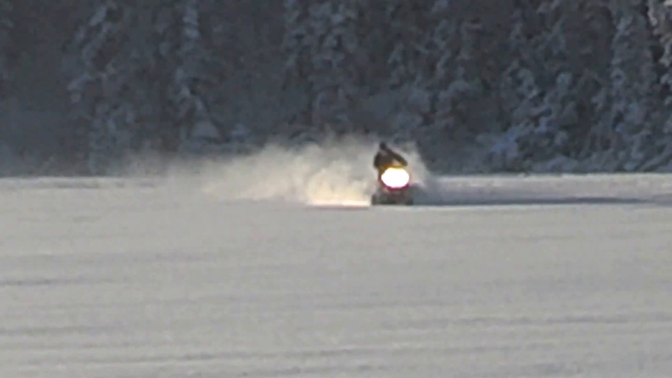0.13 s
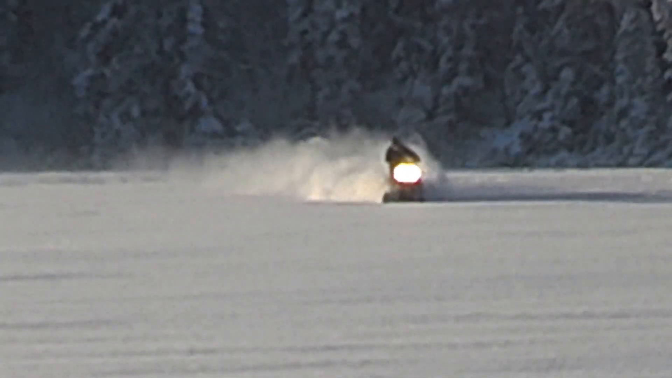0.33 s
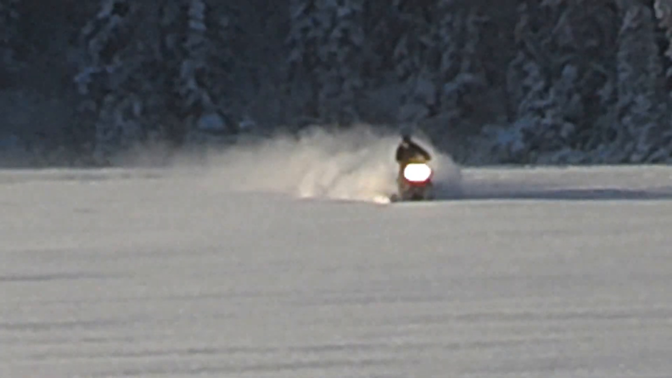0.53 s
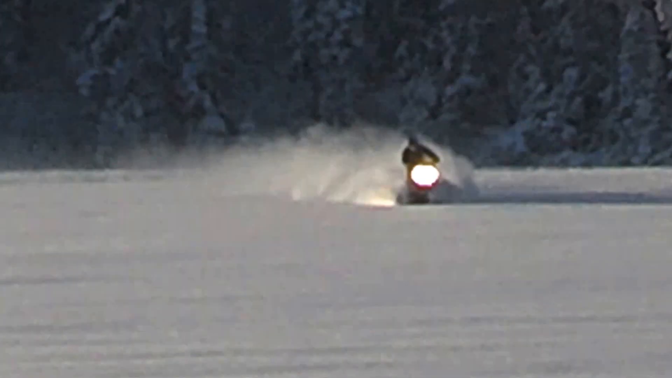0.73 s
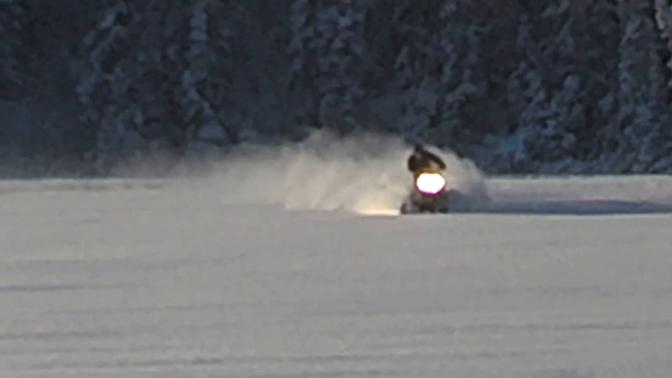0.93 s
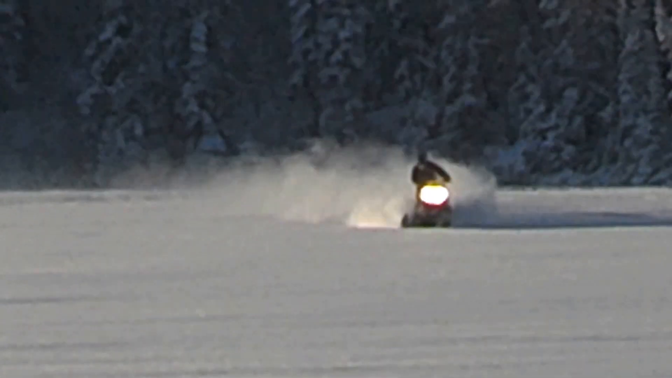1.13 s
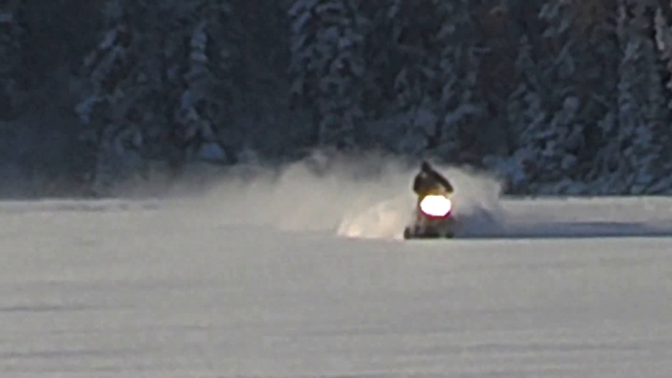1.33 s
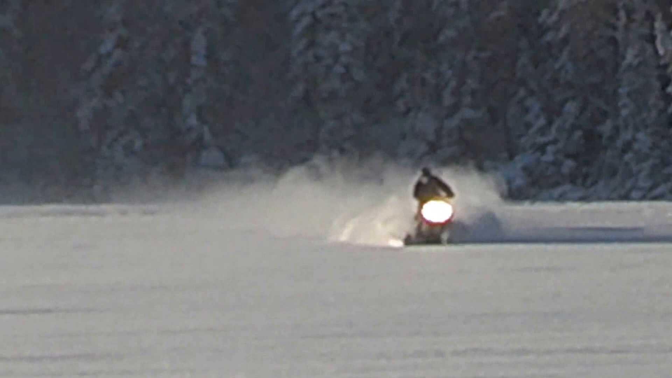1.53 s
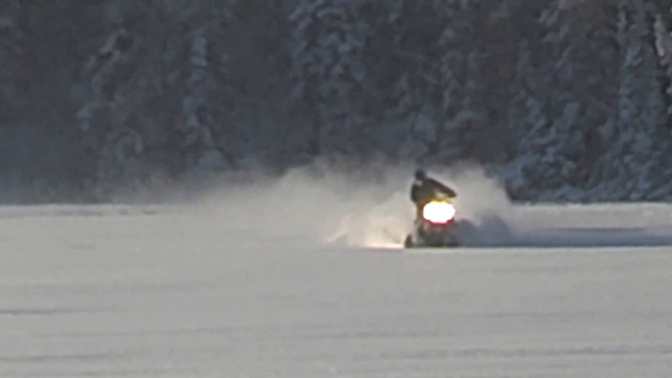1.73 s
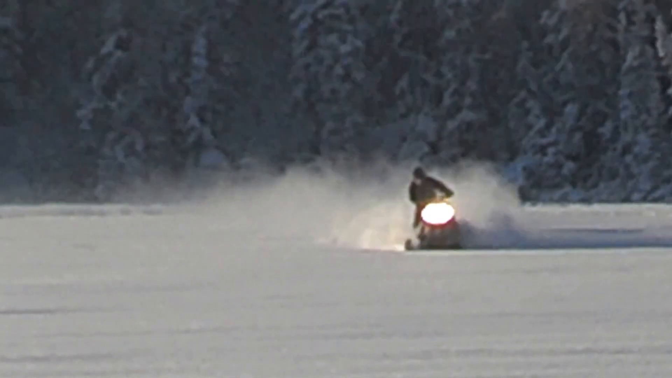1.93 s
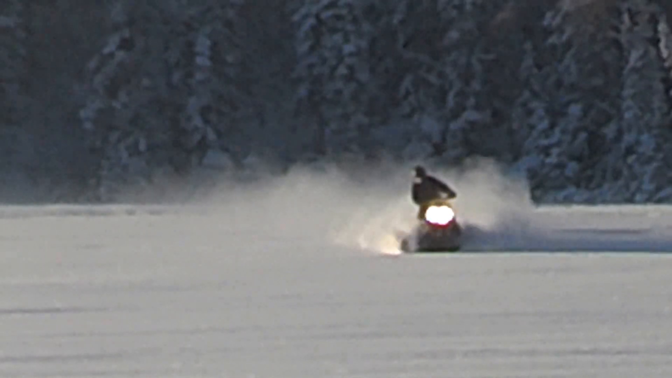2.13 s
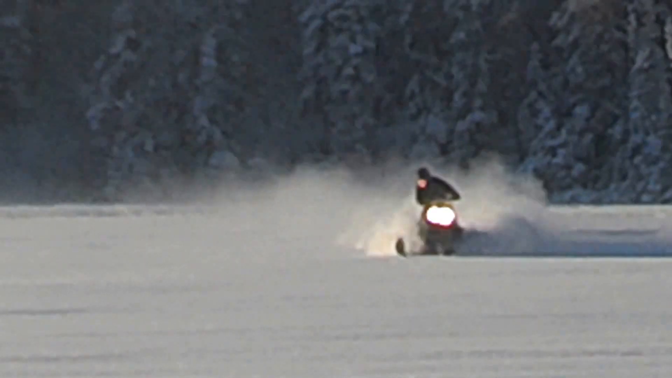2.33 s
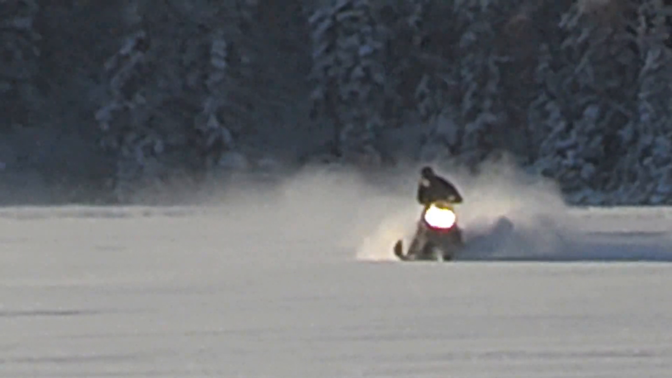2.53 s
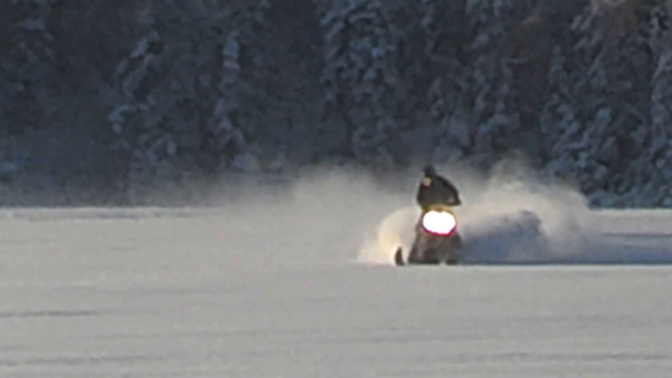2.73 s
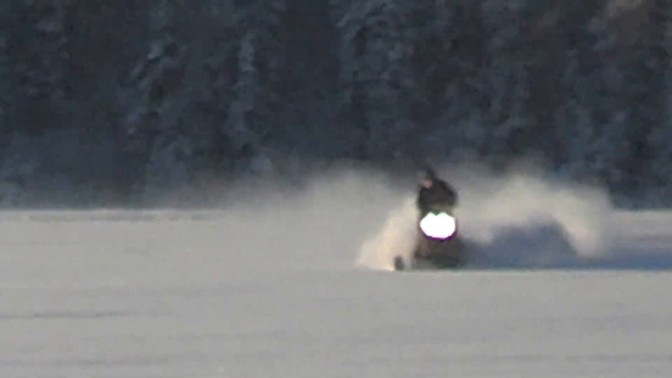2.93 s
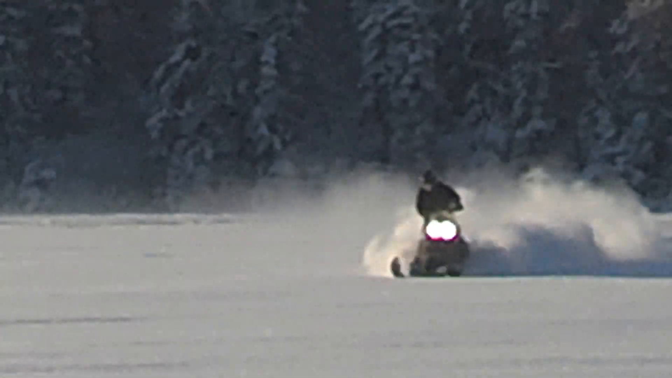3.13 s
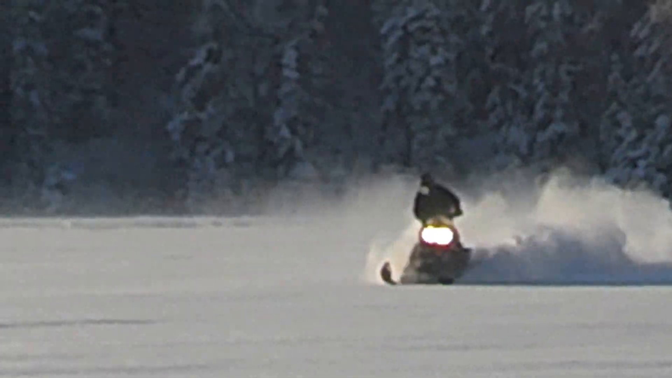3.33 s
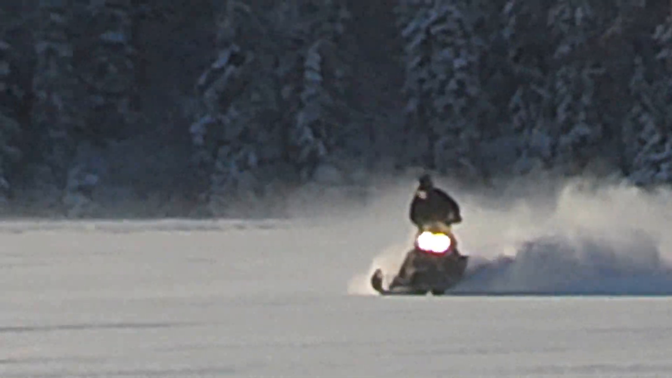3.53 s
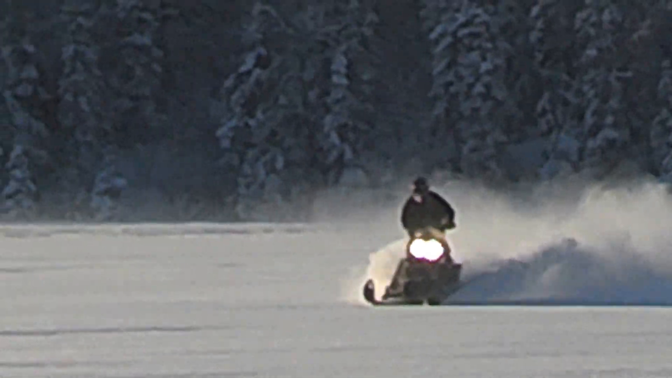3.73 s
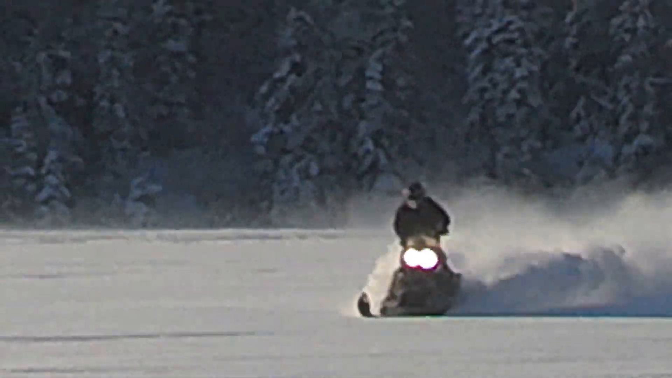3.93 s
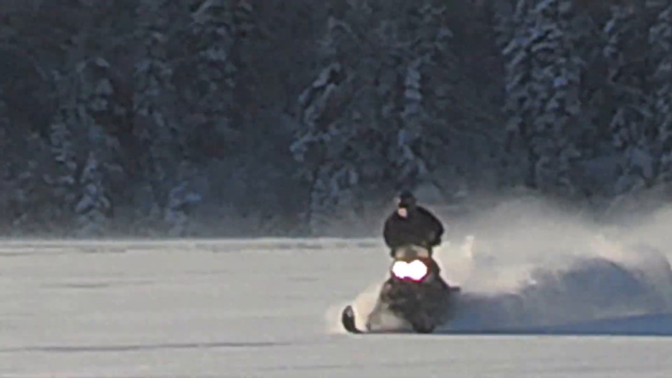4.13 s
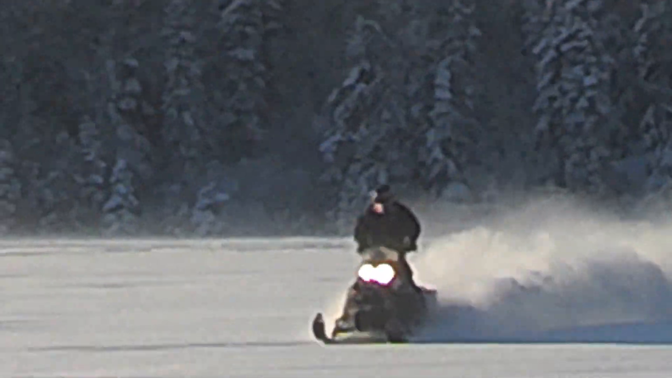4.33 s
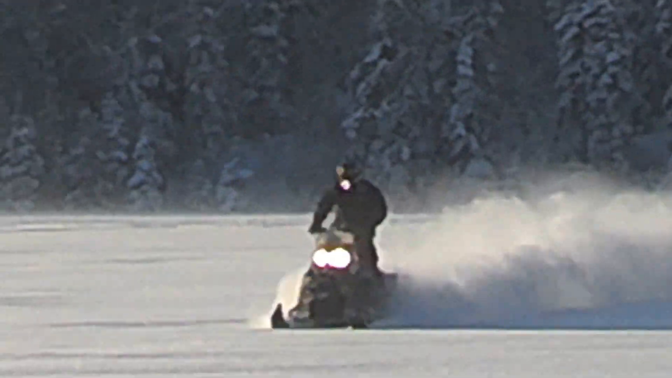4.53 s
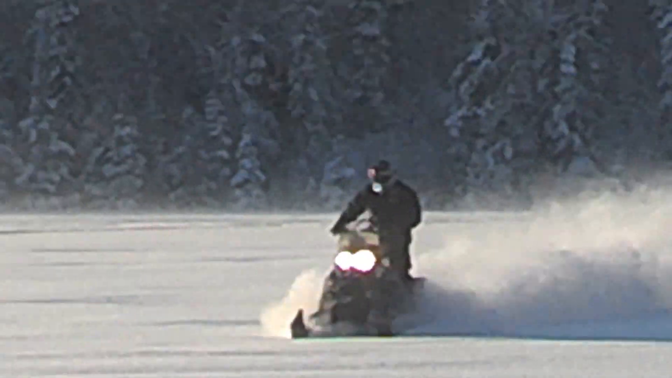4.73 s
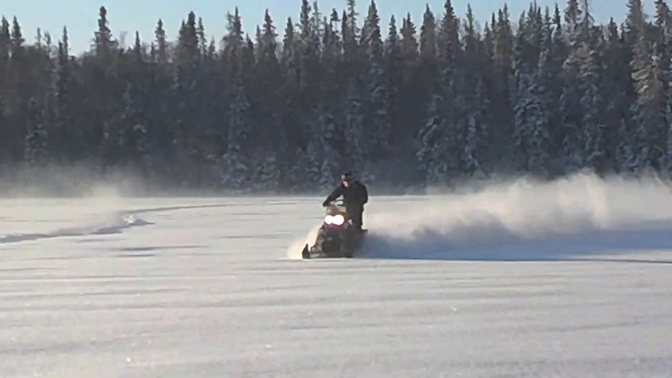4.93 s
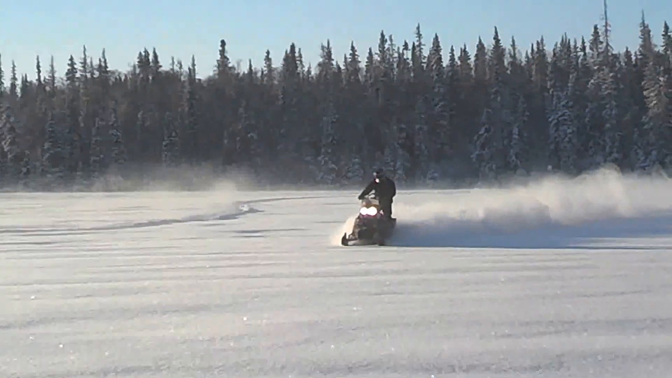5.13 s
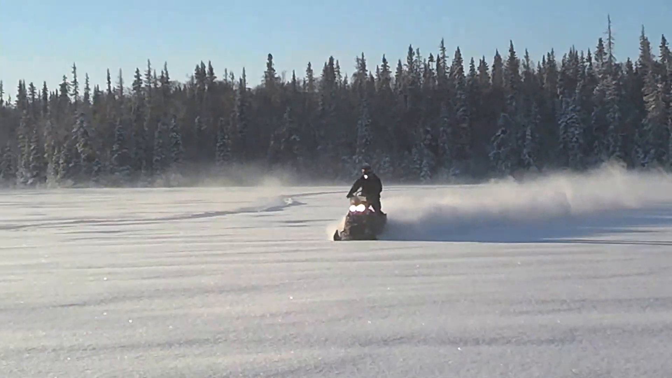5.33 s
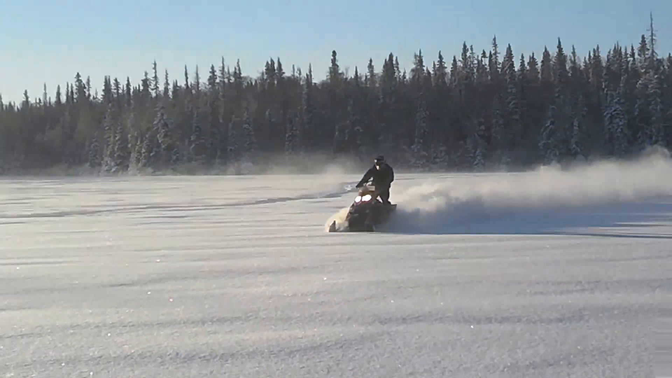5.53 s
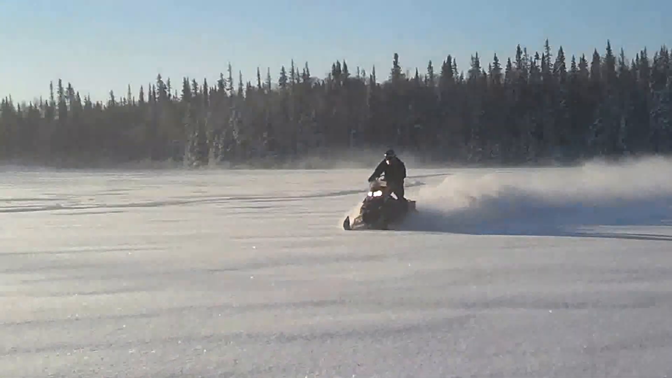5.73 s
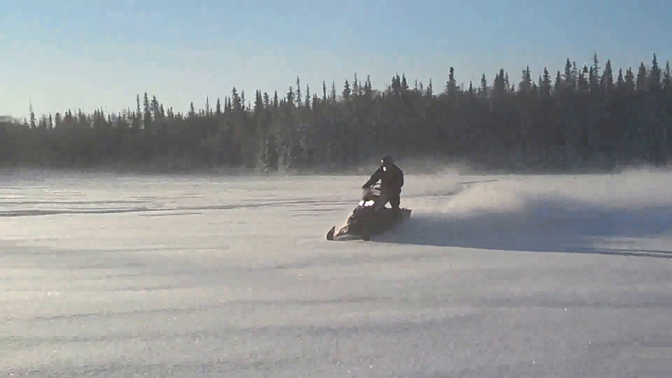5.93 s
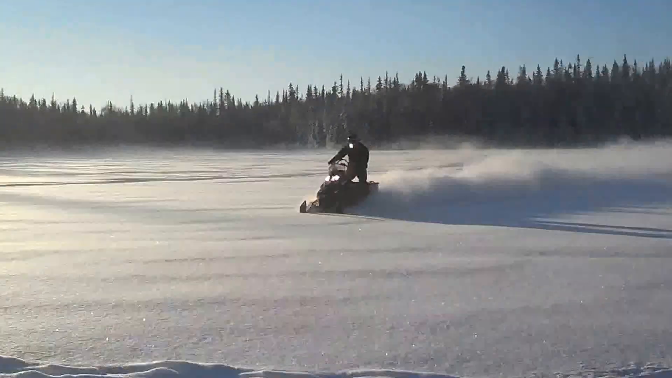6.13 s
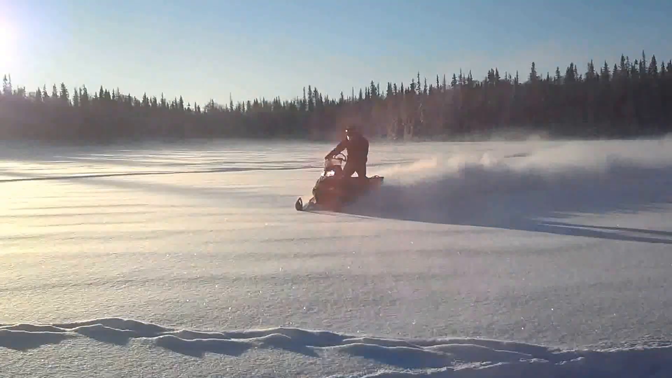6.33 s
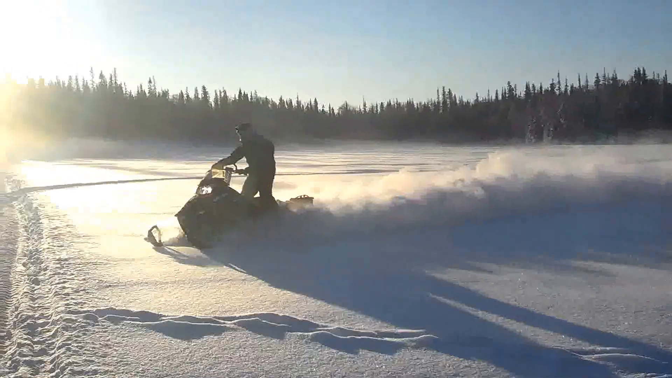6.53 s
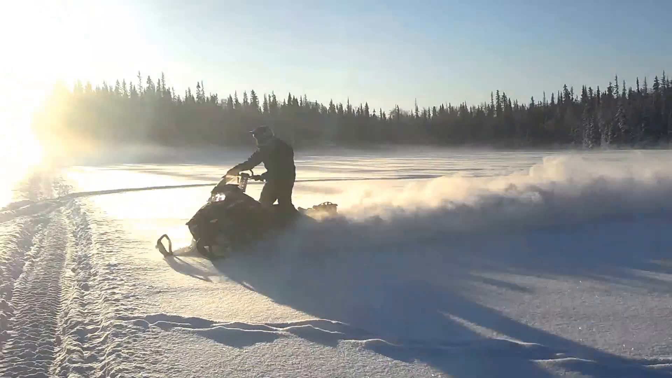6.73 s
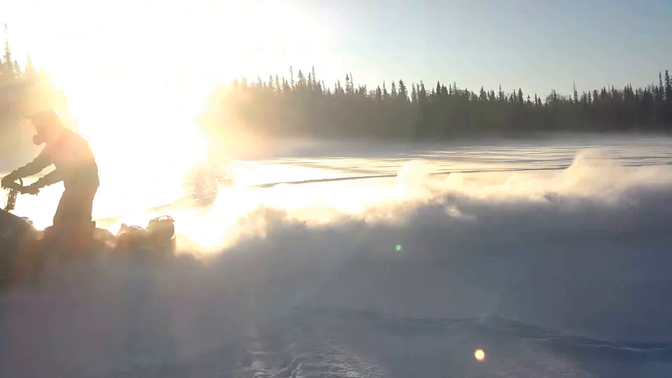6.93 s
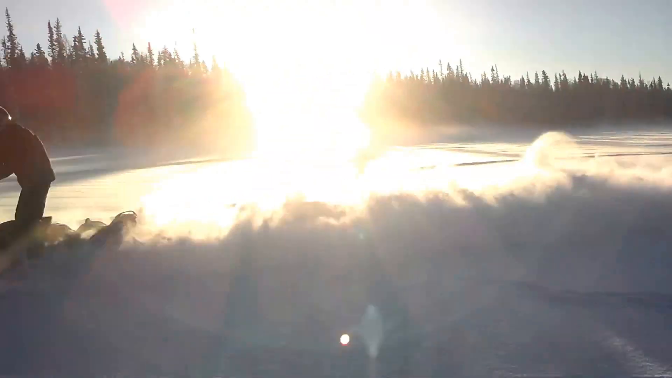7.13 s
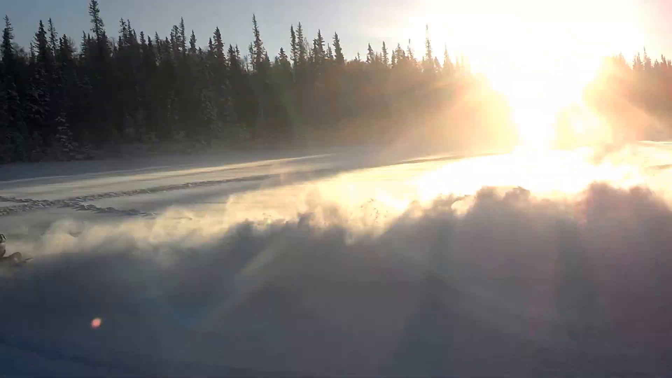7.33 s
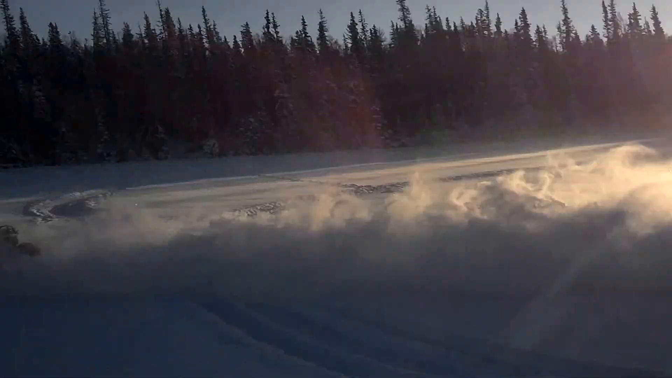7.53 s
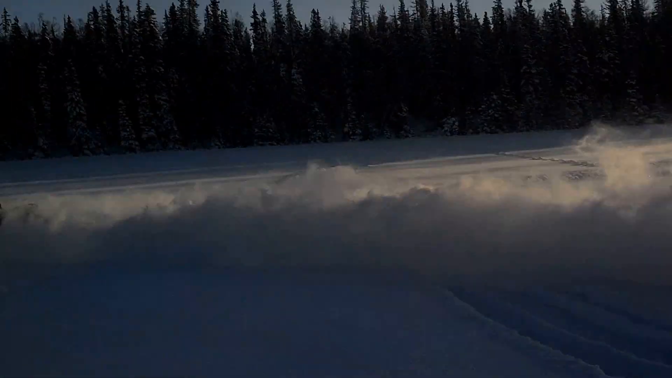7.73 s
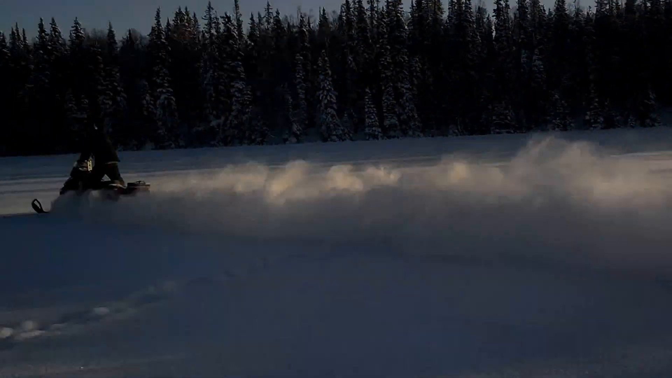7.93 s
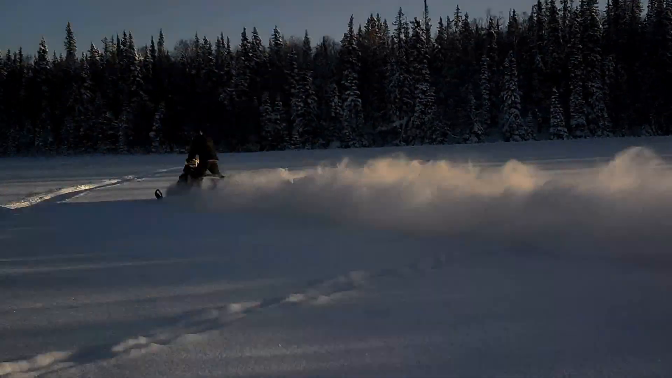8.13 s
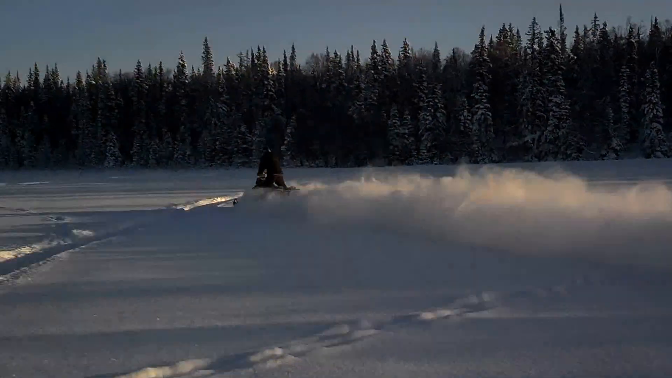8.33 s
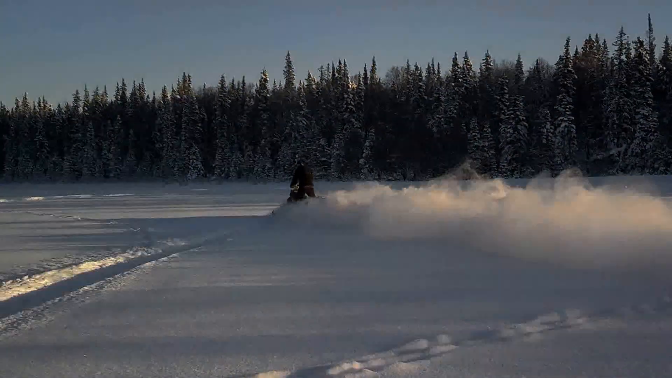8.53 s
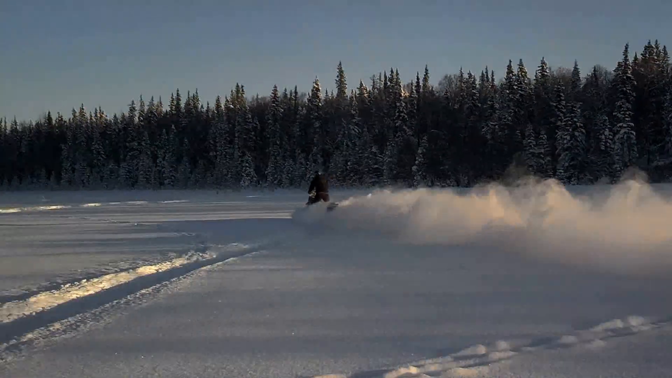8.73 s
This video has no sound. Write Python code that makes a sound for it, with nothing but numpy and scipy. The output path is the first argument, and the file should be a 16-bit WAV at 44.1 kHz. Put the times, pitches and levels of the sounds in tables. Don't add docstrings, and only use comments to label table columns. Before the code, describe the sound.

A parked engine idles low beside a handheld stereo microphone, puffing and knocking. Far off, a snowmobile's nasal two-stroke whine wavers, bogs down and climbs, growing louder and rougher as it nears. At full roar the sound drops out for under half a second, returns with a stuttering scrap, then continues lower and raspier, with track whir and flung snow. Faint tree echoes surround it.

```python
import sys
import numpy as np
from scipy import signal
from scipy.fft import rfft, irfft, next_fast_len
from scipy.io import wavfile
from scipy.ndimage import uniform_filter1d

SR = 44100
rng = np.random.default_rng(int(sys.argv[2]) if len(sys.argv) > 2 else 0)


def to_wav(sig):
    pcm = np.clip(np.atleast_2d(sig), -1, 1) * 32767
    pcm = np.round(pcm).astype(np.int16)
    wavfile.write(sys.argv[1], SR, pcm.T)


def makeup_ratio(level_db):
    decades = np.asarray(level_db, float) / 20
    return 10 ** decades


N = 391608
TIME = np.arange(N) / SR
STALL, RESUME, SETTLED = 6.333, 6.754, 6.805
HELD = np.where((TIME > STALL) & (TIME < SETTLED), STALL, TIME)
CROSS = 16

# t/s, roar level/dB
RIDE = [(0, -39), (.4, -35.5), (1, -37.5), (1.3, -38), (2.2, -35.5), (2.85, -33), (3.3, -33), (3.9, -30.5),
        (4.87, -26.5), (5.3, -22.5), (6.32, -21), (6.82, -23.5), (7.5, -23.5), (7.9, -26), (8.36, -23),
        (8.65, -24), (8.88, -24.5)]
# t/s, stage (0 far, 1 closing, 2 near, 3 past, 4 gone), throttle level/dB
STAGE = [(0, 0.5, -0.5), (.9, 0, -4.5), (1.6, 0.5, -1), (3.4, 1, -2), (4.7, 3, -3), (5.7, 2.5, 3.5),
         (6.3, 2, 6), (6.85, 8, 0.5), (7.3, 3, 3.5), (7.9, 7, -4), (8.3, 5.5, -4), (8.88, 4, -5.5)]
# t/s, lead of the left port/samples
BEARING = [(0, 4.43), (3, 3.85), (6.3, 4.2), (6.82, 10.5), (7.15, 10.8), (7.4, 12), (7.7, 8.2), (8.2, 6.1),
           (8.88, 6.6)]
NEAR_DB = -23


def snowmobile():
    hz = crank()
    roar_db, = curves(RIDE)
    stage, throttle_db = curves(STAGE)
    clatter_db = -43 + 1.1 * (roar_db - NEAR_DB)
    spray_db = -42 + 1.61 * (roar_db - NEAR_DB)
    turns = np.cumsum(hz * (1 + 0.001525 * drift(hz=21.8))) / SR
    engine = engine_orders(hz, turns, stage, throttle_db, roar_db, clatter_db)
    engine += roar_and_clatter(turns, stage, throttle_db, roar_db, clatter_db)
    engine += track_lugs()
    return ports(engine, curves(BEARING)[0], bends=True) + trees(engine) + snow_spray(spray_db)


# t/s, f/Hz
CRANK = [(0, 121.4), (.6, 117.5), (2.04, 117.8), (2.35, 127), (3.05, 126), (3.3, 123.3), (3.52, 125.9),
         (3.63, 123.6), (3.95, 129), (5.3, 129.9), (6.32, 128.6), (6.82, 121.3), (7.18, 109.6),
         (7.45, 111.6), (7.62, 107.7), (8.6, 103.3), (8.88, 106.1)]
# deepest t/s, drop f/Hz, sinking t/s, recovery t/s
BOGS = [
    (.32, 14, .2, .25),
    (.9, 16, .23, .42),
    (2.8, 8.8, .3, .23),
    (5.68, 3, .17, .24),
    (8.22, 12.2, .62, .4),
]


def crank():
    hz, = curves(CRANK)
    for s, drop_hz, sink, rise in BOGS:
        depth = np.interp(HELD, [s - sink, s, s + rise], [0, 1, 0])
        hz = hz - drop_hz * np.sin(np.pi / 2 * depth) ** 2
    return hz


PASS_S, PASS_SPREAD_S, DOPPLER_DROP = 7.4, 0.27, 0.1458


def engine_orders(hz, turns, stage, throttle_db, roar_db, clatter_db):
    passed = (1 + np.tanh((HELD - PASS_S) / PASS_SPREAD_S)) / 2
    pipe_hz = hz / (1 - DOPPLER_DROP * passed)
    sweep_hz_s = uniform_filter1d(abs(np.gradient(hz)) * SR, size=4000)
    sweep_db = np.minimum(.06 * sweep_hz_s, 4) * (stage < .5)
    fan_db = 7 * np.clip(1 + (roar_db - NEAR_DB) / 5, 0, 1)
    sparse = slice(None, None, 100)
    engine = np.zeros(N)
    for k in range(1, 42):
        if k < 24:
            pipe_db = exhaust_db(k * pipe_hz[sparse], stage[sparse]) + sing_db(k, hz[sparse], TIME[sparse])
            db = throttle_db + np.interp(TIME, TIME[sparse], pipe_db)
            db += 1.5 * (k % 3 == 0)
        else:
            db = clatter_db - 7 - .3 * (k - 24) + fan_db * (k == 34)
        engine += tone(turns, k, db - sweep_db + 2.2 * drift(hz=5.))
    return engine


# f/Hz, level/dB
EXHAUST_FAR = [(130, -65), (390, -60), (520, -51.5), (1300, -45.5), (1800, -76.5), (2050, -76),
               (3000, -61.5)]
# f/Hz, level/dB
EXHAUST_NEAR = [(130, -51.5), (260, -46.5), (390, -52.5), (520, -50.5), (900, -48.5), (1300, -45.5),
                (2200, -43.5), (3000, -67)]
# f/Hz, level/dB
EXHAUST_BEHIND = [(130, -59.5), (260, -50), (520, -44), (900, -48.5), (1300, -43), (2200, -38.5),
                  (3000, -59.5)]
# f/Hz, width f/Hz, lift level/dB from afar, close in front, from behind
PIPE = [(455.7, 40, 16.5, 1.7, 0.58), (645, 35, -18.5, 4, 4), (787, 75, 4.5, 3.3, 3.1),
        (970, 53, 0.5, 0.51, 3.7), (1124, 88, 9.5, 3, 8.1), (1472, 100, 14.5, 3, 2.2), (2001, 26, 1, 5, 4)]


def exhaust_db(hz, stage):
    aspects = [np.transpose(points) for points in (EXHAUST_FAR, EXHAUST_NEAR, EXHAUST_BEHIND)]
    far, near, behind = [np.interp(np.log(hz), np.log(f), db) for f, db in aspects]
    for f, w, *lift_db in PIPE:
        resonance = 1 / (1 + (2 * (hz - f) / w) ** 2)
        far, near, behind = [far, near, behind] + np.outer(lift_db, resonance)
    arriving = (near - far) * np.clip(stage / 2, 0, 1)
    leaving = (behind - near) * np.clip(stage - 2, 0, 1)
    return far + arriving + leaving


# t/s, spread t/s, heard f/Hz, lift level/dB
SINGS = [(1.65, .42, 1645, 10), (1.7, .5, 940, 5), (2.2, .15, 1470, 8), (2.35, .25, 1135, 5),
         (4.3, .4, 1160, 6), (3.45, .53, 1120, 13), (3.35, .5, 1495, 9), (5, .9, 1945, 6),
         (5.7, .75, 645, 7), (5.6, .9, 775, 6), (5.65, .2, 512, 9), (5.68, .2, 1020, 8),
         (5.7, .14, 1145, 8), (6, .5, 1160, 6), (6.15, .2, 645, 5), (6.1, .25, 1680, 7), (6.15, .2, 515, 8),
         (7.5, .33, 660, 12), (7.68, .13, 960, 6), (7.68, .13, 1490, 8), (8.1, .25, 475, 10),
         (8.35, .13, 1520, 11), (8.22, .1, 1120, 9), (8.42, .13, 980, 8), (8.7, .25, 1145, 10),
         (8.8, .3, 630, 14), (8.66, .22, 835, 13), (8.78, .14, 1050, 12)]


def sing_db(k, hz, t):
    lift_db = 0
    for s, spread, f, db in SINGS:
        if round(f / np.interp(s, t, hz)) == k:
            lift_db = lift_db + db * np.exp(-((t - s) / spread) ** 4)
    return lift_db


# f/Hz, level/dB per Hz
ROAR = [(100, -18.5), (170, -5), (190, -14), (263, -5), (331, -4.5), (636, 2.5), (757, -3.5), (1140, 5),
        (1250, 4.5), (1710, 5), (2300, -35), (2990, -48), (5060, -120)]
# f/Hz, level/dB per Hz
CLATTER = [(1800, -23.5), (2400, -8), (2900, -18), (3500, 11), (4300, -0.5), (5200, -7.5), (6500, -3),
           (9000, -38)]
# f/Hz, level/dB per Hz
RASP = [(1500, -24), (1850, 1.5), (2200, -3), (2550, 2), (3000, -60)]
RASP_DB = [-52, -44, -36, -37.5, -27.5]


def roar_and_clatter(turns, stage, throttle_db, roar_db, clatter_db):
    beat = np.exp(-(2 * turns % 1) / 0.31)
    roar = evened(noise(ROAR, patchy_db=1.5) * (2.9 + beat))
    clatter = evened(noise(CLATTER, patchy_db=4.5) * (1.9 + beat))
    rasp = evened(noise(RASP, patchy_db=1.5) * (1.3 + beat))
    clatter_db = clatter_db + 4 * (TIME > SETTLED)
    rasp_db = throttle_db + np.interp(stage, range(5), RASP_DB)
    return makeup_ratio(roar_db - 4.0) * roar + makeup_ratio(clatter_db) * clatter + makeup_ratio(rasp_db) * rasp


# t/s, f/Hz, level/dB
TRACK = [(6.82, 155.3, -38), (7.066, 138.3, -33.5), (7.44, 138.6, -35), (7.5, 135.4, -48),
         (8.088, 122.2, -47.5), (8.3, 122.2, -43)]
LUG_ORDERS_DB = [-6, 0, -8]


def track_lugs():
    lug_hz, lug_db = curves(TRACK)
    turns = np.cumsum(lug_hz) / SR
    lugs = sum(tone(turns, k, lug_db + db) for k, db in enumerate(LUG_ORDERS_DB, 1))
    return lugs * (TIME > SETTLED) * np.clip((8.4 - TIME) / 0.17, 0, 1)


# f/Hz, level/dB per Hz
SPRAY = [(3000, 2.5), (5500, 0.5), (6800, -6.5), (8700, -3), (12000, -6.5), (15000, -6.5), (17000, 4.5)]


def snow_spray(spray_db):
    gusts = makeup_ratio(spray_db + 7.0 + 0.82 * drift(hz=47.0))
    return gusts * np.array([noise(SPRAY, patchy_db=-1.5), noise(SPRAY, patchy_db=0.0)])


# t/s, firing f/Hz, level/dB, bearing as left-right level/dB
IDLE = [(0, 39, -38, -19.5), (.56, 41.05, -38, -19.5), (1.05, 40.25, -38, -21), (2, 39.32, -38, -17),
        (2.64, 40.47, -38, -23), (3.43, 39.5, -37.5, -19), (3.63, 40.83, -38, -22),
        (4.87, 39.8, -38.5, -31), (5.51, 38.43, -40, -74), (6.32, 40.1, -44, -14.5), (6.82, 37.96, -51, -8),
        (7.15, 37.98, -60, -16), (7.54, 43.07, -40.5, 9), (7.71, 40.53, -44, 12), (8.47, 40.17, -38.5, 16),
        (8.88, 39.95, -38.5, 17)]
# order, level/dB
IDLE_ORDERS = [(1, -22.5), (2, -12), (3, 1), (4, -6.5), (5, -11.5), (6, -22), (7, -8.5), (8, -20.5),
               (9, -13.5), (10, -15)]
# f/Hz, level/dB per Hz
IDLE_PUFF = [(50, -40), (90, -4.5), (200, -1.5), (400, -2.5), (700, -1.5), (1100, 1.5), (1600, -5.5),
             (2200, -11), (3500, -61)]
# t/s, nominal peak level/dB (unused: only the times steer the crank)
KNOCKS = [
    (0.223, -21),
    (0.7117, -27),
    (1.061, -16),
    (1.1138, -24),
    (1.2126, -37),
    (1.3655, -24),
    (1.414, -25),
    (1.5599, -26),
]


def idler():
    hz, db, bearing_db = curves(IDLE)
    db = uniform_filter1d(db, size=9000)
    fires = np.cumsum(hz * (1 + .008 * drift(hz=12.))) / SR
    at = np.transpose(KNOCKS)[0]
    slip = np.interp(at, TIME, fires) / 2
    fires += 2 + 2 * np.interp(TIME, at, np.unwrap(-slip % 1, period=1))
    top_db = IDLE_ORDERS[2][1]
    hum = sum(tone(fires, k, db + o_db - top_db + 1.2 * drift(hz=12.0)) for k, o_db in IDLE_ORDERS)
    strength_db = 1.5 * rng.standard_normal(500) + np.resize([1.5, -1.5], 500)
    strength = makeup_ratio(strength_db)[fires.astype(int)]
    puffs = evened(noise(IDLE_PUFF, patchy_db=1.5) * (.7 + strength * np.exp(-(fires % 1) / .4)))
    clear = np.isin(fires // 2, np.round(np.interp(at, TIME, fires) / 2))
    since = (fires / 2 % 1) * 2 / hz
    ring = np.sin(2 * np.pi * 1120 * since) * np.exp(-since / .005) * np.tanh(since / .0005)
    knock = strength * ring * makeup_ratio(db + 12 + 3.5 * clear)
    lag = lag_of(uniform_filter1d(bearing_db, size=9000))
    return ports(hum + makeup_ratio(db + 4.5) * puffs + knock, lag)


def lag_of(bearing_db):
    return CROSS * np.tanh(bearing_db * np.log(10) / 40)


# t/s, peak level/dB, centre f/Hz, width f/Hz, length t/s
HANDLING = [
    (2.71, -31, 1980, 500, 0.022),
    (3.043, -15, 12900, 3955, 0.0012),
    (3.348, -28, 13270, 3020, 0.019),
    (4.165, -28, 150, 121, 0.021),
    (8.52, -20, 229, 250.2, 0.029),
]


def handling():
    out = np.zeros((2, N))
    for s, db, hz, width_hz, length in HANDLING:
        at = slice(round((s - .1) * SR), round((s + .1) * SR))
        edges = [hz - width_hz / 2, hz + width_hz / 2]
        band = signal.butter(4, edges, "bandpass", fs=SR, output="sos")
        burst = evened(signal.sosfilt(band, rng.standard_normal(len(TIME[at]))))
        burst *= makeup_ratio(db - 10.5) * np.exp(-((TIME[at] - s) / length) ** 2 * 2)
        out[:, at] += [burst, np.roll(burst, -1)]
    return out


def trees(x):
    t = np.arange(SR // 3) / SR
    decay = makeup_ratio(-60 * t / .35) * (t > .004)
    taps = rng.standard_normal((2, len(t))) * (rng.random((2, len(t))) < .05) * decay
    taps = signal.sosfilt(signal.butter(2, 350, "highpass", fs=SR, output="sos"), taps)
    return makeup_ratio(-13) * signal.oaconvolve(x[None], taps / np.linalg.norm(taps[0]), axes=1)[:, :N]


def capsule_hiss():
    treble = signal.butter(2, 2500, "highpass", fs=SR, output="sos")
    return makeup_ratio(-56) * signal.sosfilt(treble, rng.standard_normal((2, N)))


# f/Hz, share of the lag
LAG_SHARE = [(600, .75), (1800, 1.05), (2300, 1.18), (3400, 1.55), (4500, 1.7)]


def ports(x, lag, bends=False):
    hz, t, z = signal.stft(x, SR, nperseg=256, noverlap=192)
    share = np.interp(hz, *np.transpose(LAG_SHARE)) if bends else 1
    turn = np.exp(1j * np.pi * np.outer(hz * share, np.interp(t, TIME, lag)) / SR)
    return signal.istft(np.array([z * turn, z / turn]), nperseg=256, noverlap=192)[1][:, :N]


def evened(x):
    return x / np.sqrt(np.mean(x ** 2) + 1e-20)


def curves(rows):
    s, *columns = np.transpose(rows)
    return [np.interp(HELD, s, c) for c in columns]


def drift(hz):
    slow = signal.butter(2, hz, fs=200, output="sos")
    steps = signal.sosfilt(slow, rng.standard_normal(2000))
    return np.interp(TIME * 200, np.arange(2000), evened(steps))


def noise(points, patchy_db):
    hz = np.fft.rfftfreq(1024, 1 / SR)
    f, db = np.transpose(points)
    a, b, patches = rng.standard_normal((N // 256 + 5, 513, 3)).T
    patches = uniform_filter1d(patches, size=9, axis=0)
    patches = evened(uniform_filter1d(patches, size=16, axis=1))
    colour = np.interp(np.log(hz + 1), np.log(f + 1), db, left=-90, right=-90)
    spectra = (a + 1j * b) * makeup_ratio(colour[:, None] + patchy_db * patches)
    return evened(signal.istft(spectra, nperseg=1024, noverlap=768)[1][:N])


def tone(turns, k, db):
    return np.sqrt(2) * makeup_ratio(db) * np.cos(2 * np.pi * (k * turns + rng.random()))


def scene():
    return snowmobile() + idler() + handling() + capsule_hiss()


def roll_off(x):
    return signal.sosfilt(signal.butter(12, 17110, fs=SR, output="sos"), x)


def record(dry):
    pair = dry - np.roll(dry[::-1], CROSS, axis=1)
    size = next_fast_len(N)
    hz = np.clip(np.fft.rfftfreq(size, 1 / SR), 60, SR / CROSS / 2)
    bass_loss = 2 * np.sin(np.pi * hz * CROSS / SR)
    pair = irfft(rfft(pair, size) / bass_loss, size)[:, :N]
    pair = signal.sosfilt(signal.butter(4, 68, "highpass", fs=SR, output="sos"), pair)
    pair = signal.oaconvolve(pair, signal.firwin(255, 15750, fs=SR)[None], "same")
    gate = 1. - (TIME > STALL) * (TIME < RESUME)
    scrap = makeup_ratio(2.5) * (TIME > RESUME + .006) * (TIME < SETTLED)
    dull = signal.sosfiltfilt(signal.butter(2, 2600, fs=SR, output="sos"), pair)
    mix = pair * uniform_filter1d(gate, size=60) + dull * uniform_filter1d(scrap, size=60)
    return roll_off(mix)


dry = scene()
out = record(dry)
to_wav(out)
```